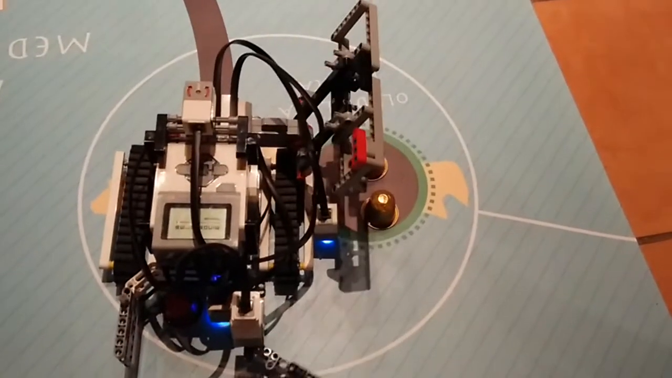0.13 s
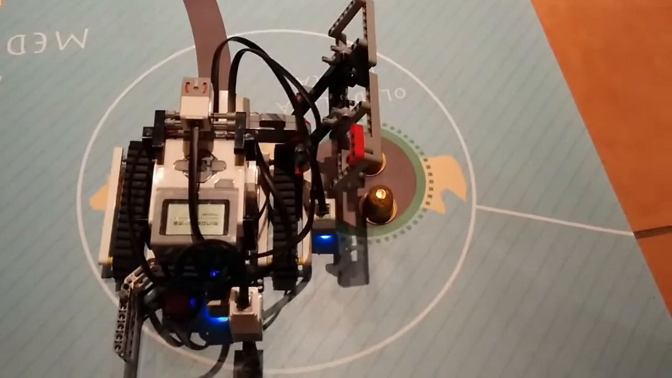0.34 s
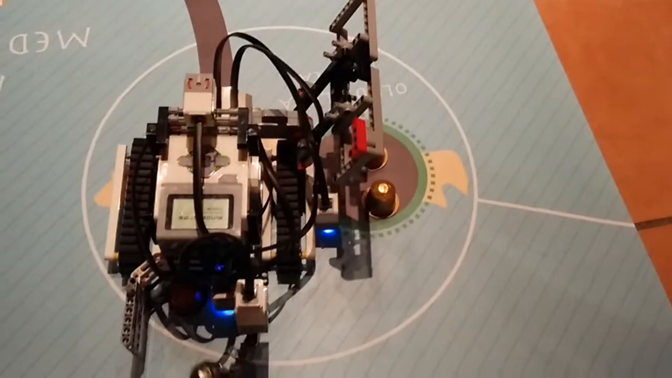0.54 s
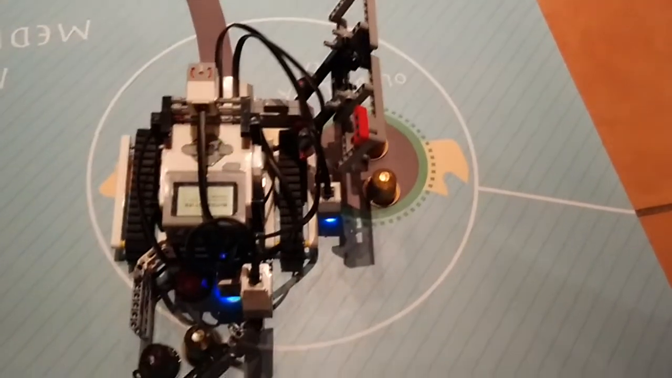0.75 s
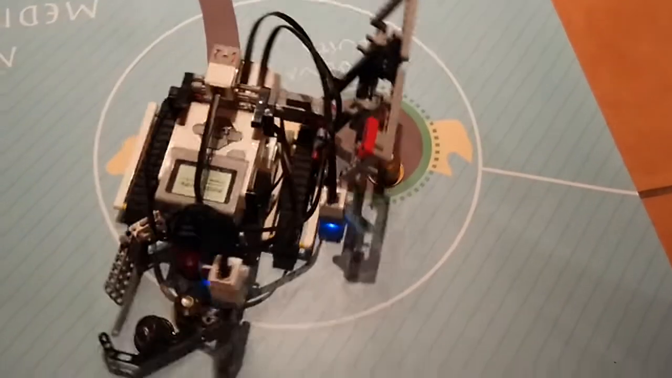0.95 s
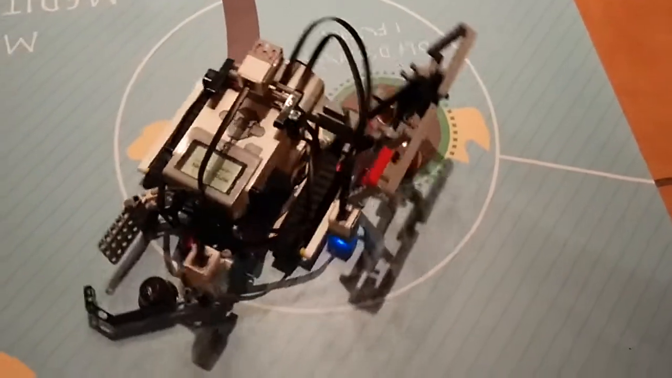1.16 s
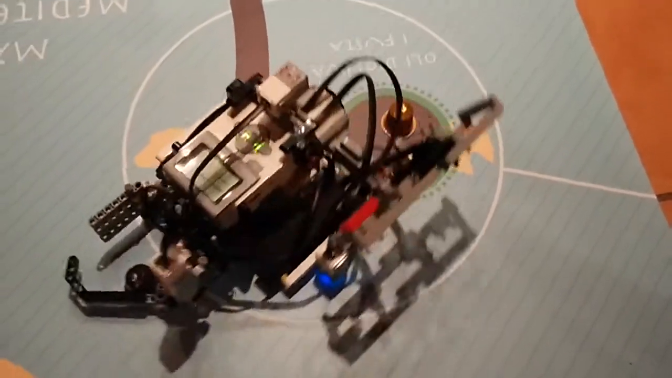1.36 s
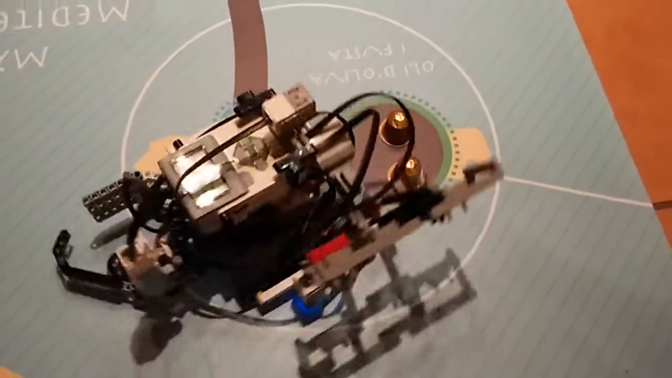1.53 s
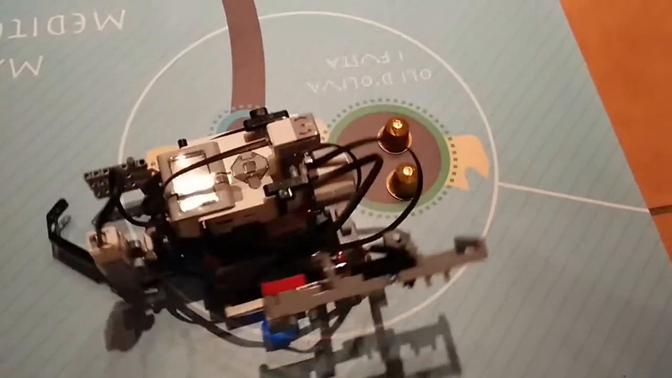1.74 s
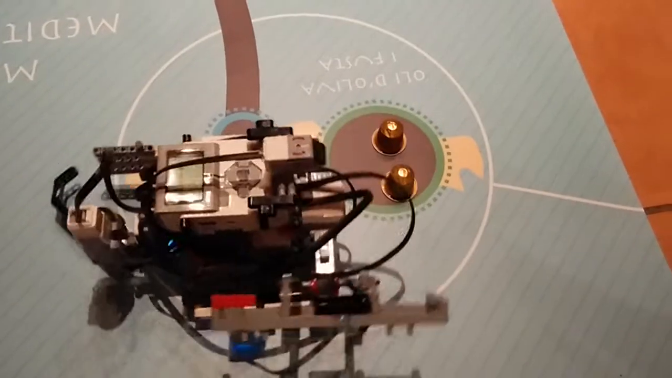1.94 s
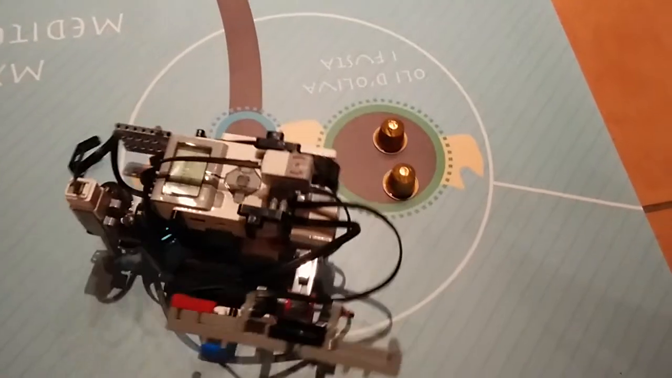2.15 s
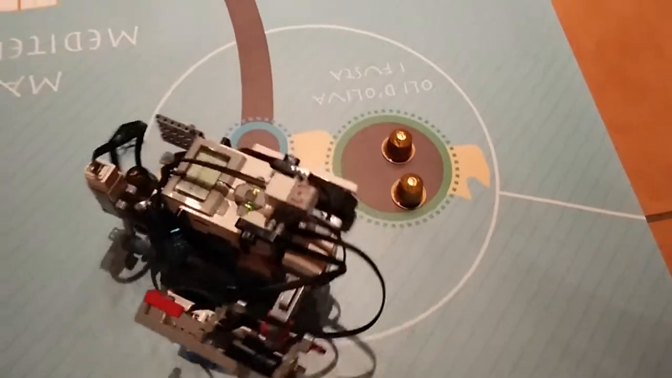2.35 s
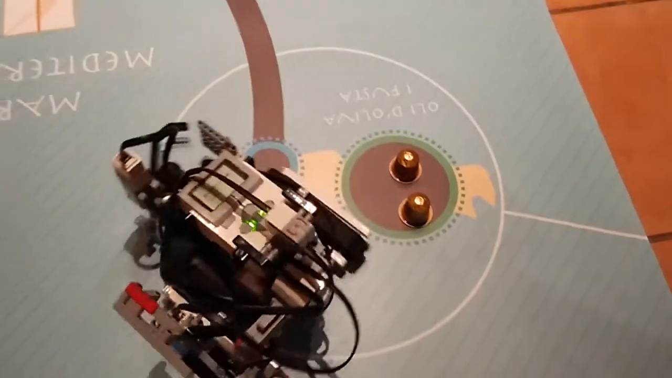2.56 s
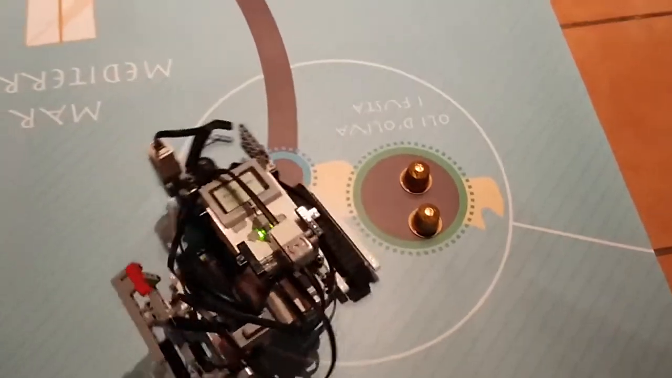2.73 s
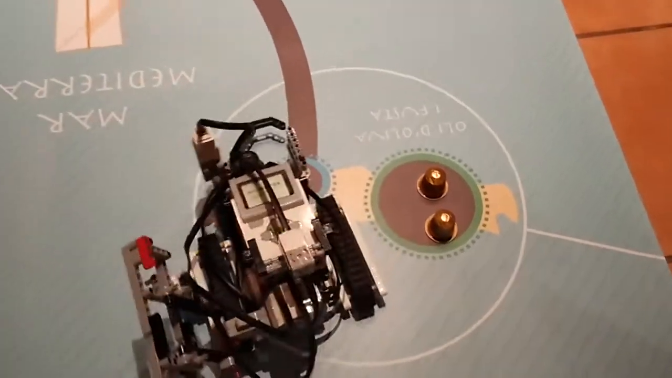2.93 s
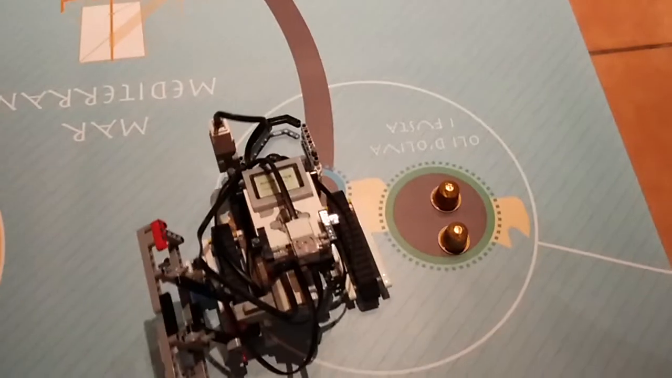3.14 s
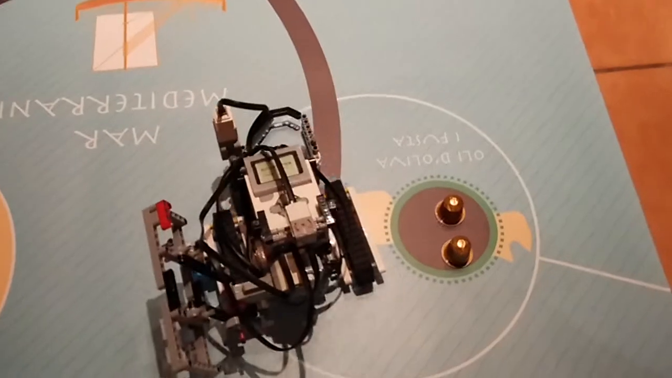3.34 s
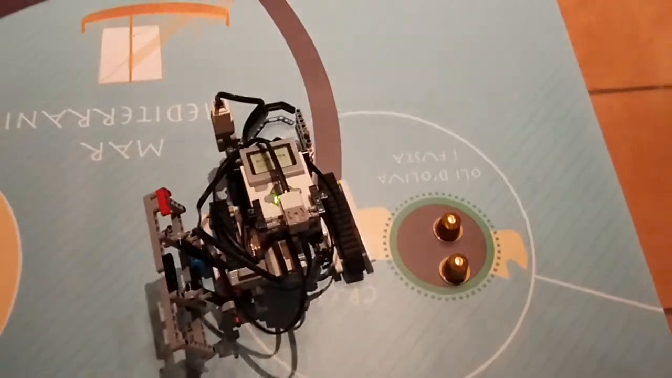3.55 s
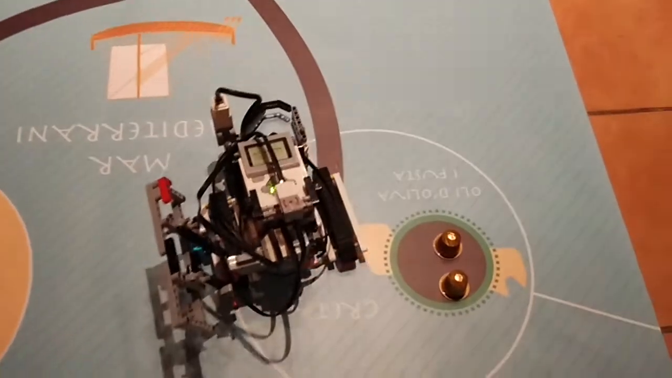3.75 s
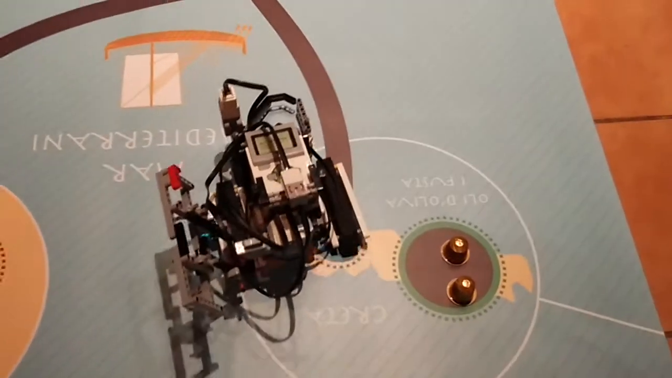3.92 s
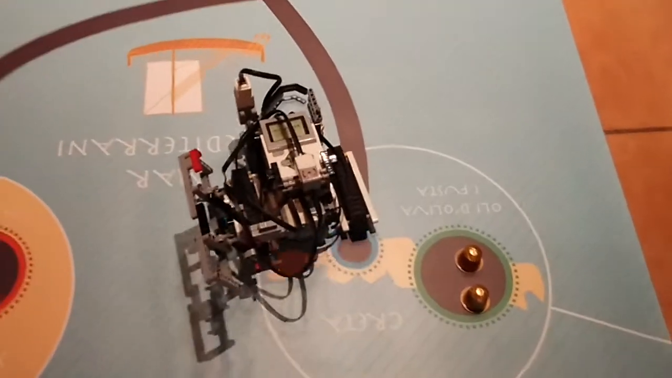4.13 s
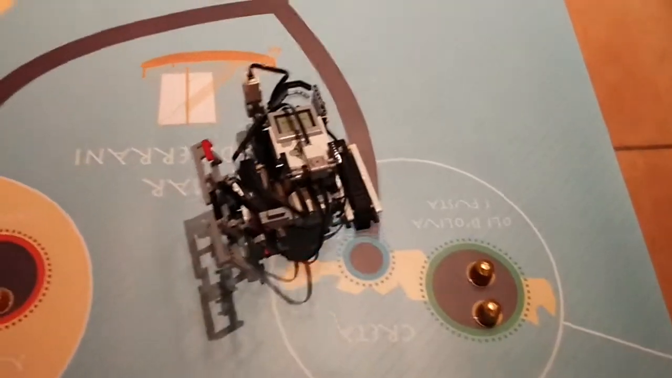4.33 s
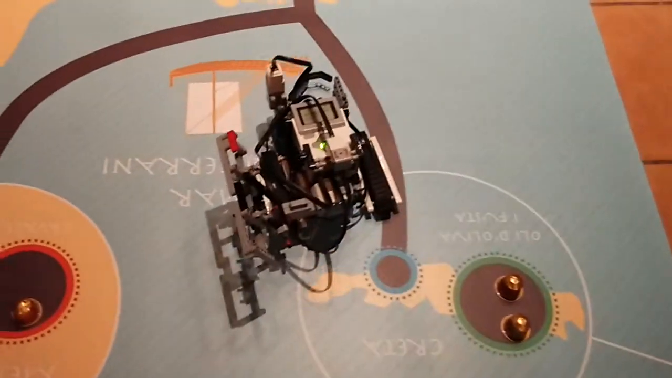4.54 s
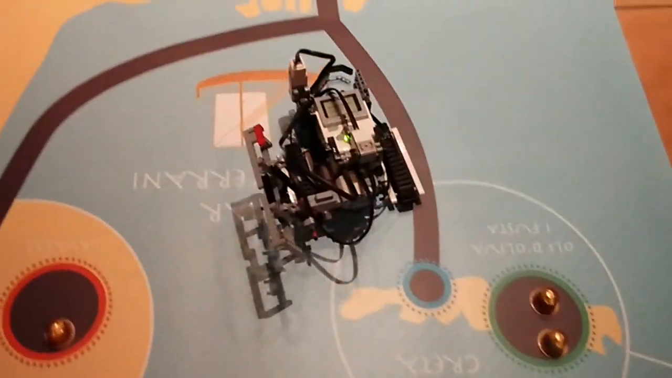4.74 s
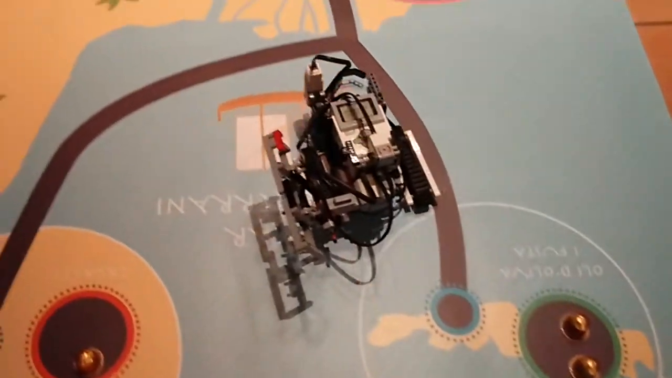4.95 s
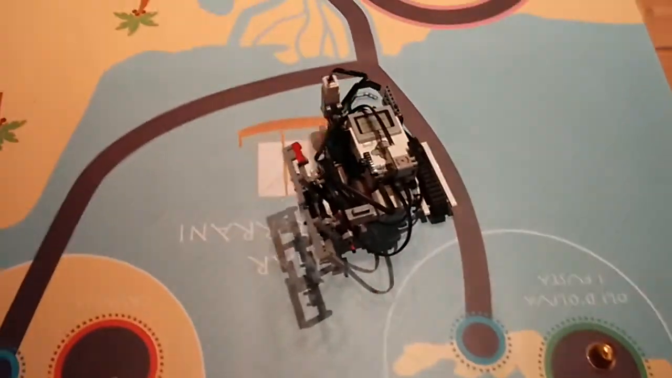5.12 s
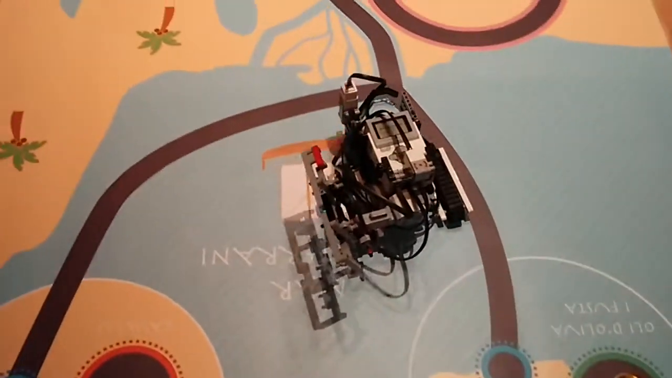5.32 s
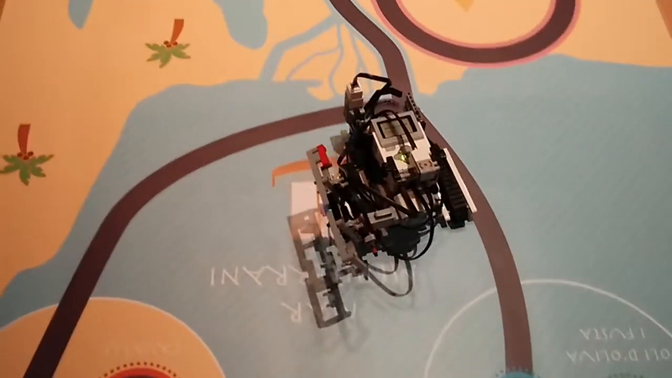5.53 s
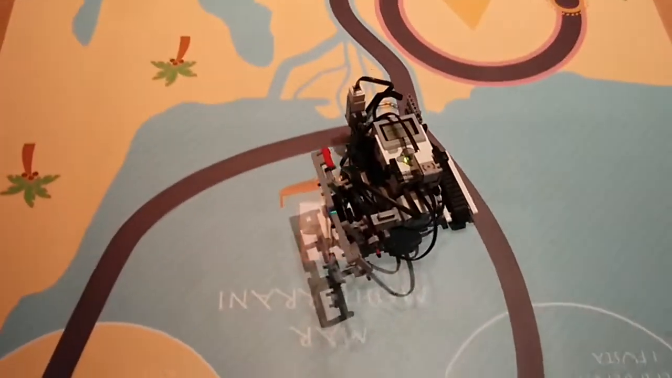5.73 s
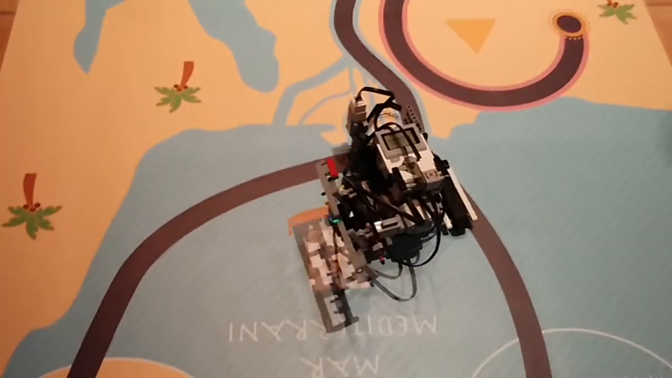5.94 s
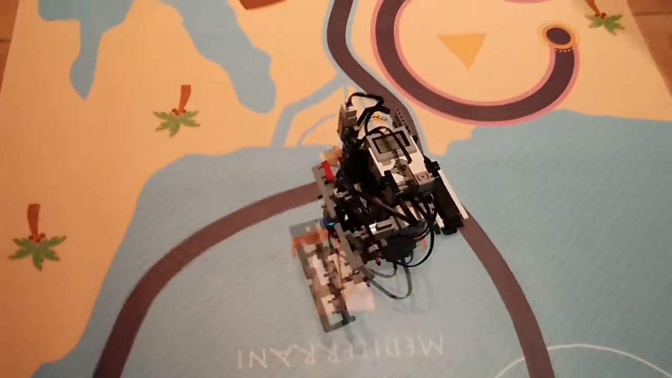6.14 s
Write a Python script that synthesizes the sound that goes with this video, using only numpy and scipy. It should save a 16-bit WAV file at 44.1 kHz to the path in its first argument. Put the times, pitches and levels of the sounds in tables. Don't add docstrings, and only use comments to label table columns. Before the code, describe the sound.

A toy robot's motors burst into a rattly, buzzing whine, soften abruptly, then climb higher with regular sags and a few dull knocks in a room.

```python
import sys
import numpy as np
from scipy import signal
from scipy.io import wavfile
from scipy.ndimage import uniform_filter1d

SR = 44100
rng = np.random.default_rng(int(sys.argv[2]) if len(sys.argv) > 2 else 0)


def voltage_ratio(level):
    return 10 ** (np.asarray(level, float) / 20)


def master(y):
    cut = np.clip(np.atleast_2d(y).T, -1, 1)
    pcm = np.round(cut * 32767)
    wavfile.write(sys.argv[1], SR, pcm.astype(np.int16))


N = 276948
T = np.arange(N) / SR
COARSE = T[::64]

# time in seconds, state
STATE = [(1.0, 0), (1.01, 1), (1.95, 1), (2.05, 2), (3.06, 2), (3.061, 0), (3.21, 0), (3.211, 3)]
AHEAD_S = 1.66, 3.27
# start in seconds, peak level in dB, pitch in Hz.
TICKS = [
    (0.046, -31.5, 5070),
    (0.209, -37.5, 5400),
    (0.292, -42, 4900),
    (0.3305, -53, 5030),
    (0.3994, -44, 5030),
]


def evened(x):
    return x / np.sqrt(np.mean(x ** 2) + 1e-20)


def read(points, hz):
    f, value = np.transpose(points)
    return np.interp(np.log(hz + 1), np.log(f + 1), value)


def curves(rows):
    s, *columns = np.transpose(rows)
    return [np.interp(T, s, column) for column in columns]


def drive_state():
    return curves(STATE)[0].round().astype(int)


def wander(rate_hz):
    low_pass = signal.butter(2, np.clip(rate_hz / SR * 128, 0, .95))
    return evened(signal.lfilter(*low_pass, rng.standard_normal(len(COARSE))))


def noise(spectrum, patchy_db=0.):
    frames, hz = N // 256 + 5, np.fft.rfftfreq(1024, 1 / SR)
    a, b, patches = rng.standard_normal((frames, 513, 3)).T
    patches = uniform_filter1d(patches, size=9, axis=0)
    patches = evened(uniform_filter1d(patches, size=10, axis=1))
    z = (a + 1j * b) * voltage_ratio(read(spectrum, hz)[:, None] + patchy_db * patches)
    return evened(signal.istft(z, nperseg=1024, noverlap=768)[1][:N])


def resonate(x, hz, width_hz):
    turn = np.exp(2j * np.pi * np.cumsum(hz * np.ones(len(x))) / SR)
    r = np.exp(-np.pi * width_hz / SR)
    smooth = signal.lfilter([(1 - r) ** 2], [1, -2 * r, r * r], x / turn)
    return 2 * (turn * smooth).real


def add(mix, s, sound):
    part = mix[round(s * SR):][:len(sound)]
    part += sound[:len(part)]


def drive():
    # time in seconds, level in dB.
    loudness = [(.7, -86), (.8, -77), (.84, -67), (.94, -32.5), (1.06, -25), (1.3, -24), (1.35, -28),
                (1.4, -25.5), (1.68, -24), (1.94, -25.5), (2.04, -38), (2.95, -38), (3.11, -40.5),
                (3.41, -36.5), (3.58, -38), (6.28, -38.5)]
    whine_levels = [2.8, 0.87, 0.42, 1.87]
    brush_levels = [-10.5, -9, -9, -6.5]
    can_levels = [-16, 1, -19, -2]

    speed_hz = motor_speeds()
    backlash = np.interp(COARSE, AHEAD_S, [.27, .5])
    (lead, shaft), (other, _) = (whine(hz, .005, .014, backlash) for hz in speed_hz)
    other_share = np.interp(T, AHEAD_S, [.45, .65])

    levels = np.array([whine_levels, brush_levels, can_levels], float)[:, drive_state()]
    whine_db, hiss_db, can_db = uniform_filter1d(levels, size=3500, axis=1)
    slip_db, slip_hz_per_s = -8, 2300
    speed_change = np.gradient(speed_hz[0]) * SR
    whine_db = whine_db + slip_db * np.minimum(speed_change / slip_hz_per_s, 1) ** 2

    throb = 1 + 0.059 * np.cos(2 * np.pi * shaft)
    teeth = voltage_ratio(whine_db) * (lead + other_share * other)
    loose = throb * (voltage_ratio(-4) * gear_rattle() + brush_hiss(hiss_db, can_db))
    level_db, = curves(loudness)
    return voltage_ratio(level_db) * (teeth + loose)


def motor_speeds():
    # time in seconds, rate in Hz.
    set_speed = [(.86, 526.5), (.92, 568), (.98, 597.9), (1.005, 694.2), (1.08, 709.6), (1.23, 710),
                 (1.45, 679.6), (1.9, 689.7), (2.2, 664), (2.6, 695.5), (2.93, 673), (3.05, 707),
                 (3.075, 696), (3.12, 562.3), (3.27, 792.4), (3.42, 878.4), (3.9, 914.5), (6.28, 905.7)]
    # slowest moment in seconds, loss of the louder motor in Hz, of the other in Hz.
    drags = [
        (3.7, 28.02, 20.7),
        (4.14, 32.15, 18),
        (4.65, 46, 40),
        (5.14, 44, 15.2),
        (5.31, 30, 12),
        (5.71, 36.1, 28),
        (6.28, 38, 14.4),
    ]
    drag_s, recover_s, speed_gap = .09, .34, .008

    set_hz, = curves(set_speed)
    lost = 0
    for s, *hz in drags:
        dip = np.interp(T - s, [-drag_s, 0, recover_s], [0, 1, 0])
        lost = lost + np.outer(hz, dip)
    both = set_hz * np.array([[1], [1 + speed_gap]]) - lost
    return uniform_filter1d(both, size=1500, axis=1)


def whine(mesh_hz, wobble, runout, fuzz, flutter_db=2.0):
    # multiple of the meshing rate, level in dB
    # speeding up, in dB while new, in dB once suppressed, in dB driving ahead.
    orders = [(1, -47, -46, -40, -26.5), (2, -23, -10.5, -14.5, -7), (2.38, -30, -19, -34, -18.5),
              (2.68, -14, -24, -14.5, -17), (3, -3, -10, -7, -5), (4, -9.5, -0.55, -7, -3),
              (4.8, -17.5, -10.5, -11, -4.5), (5, -18, 4, -3, -17), (5.4, -34, -21, -9, -15),
              (6, 2.5, 2, 2, -13), (6.4, -6.5, -10, -22, -19), (7, 0, -3.5, -9, -6),
              (8, -46, -0.5, -5, -26)]
    # frequency in Hz, level in dB.
    plastic_body = [(3250, 1), (3400, -6.5), (3530, -1), (3900, -3.5), (4100, 0), (4270, -5.5), (4700, 3.5),
                    (5560, 0), (5800, -21), (6500, -38)]
    teeth_per_turn = 10

    unsteady = 1 + wobble * np.interp(T, COARSE, wander(13.4))
    turns = np.cumsum(mesh_hz * unsteady) / SR
    off_centre = np.sin(2 * np.pi * (turns / teeth_per_turn + rng.random()))
    teeth = turns + runout * off_centre
    state = drive_state()[::64]
    out = 0
    for k, *db in orders:
        level_db = uniform_filter1d(np.array(db, float)[state], size=30)
        size = voltage_ratio(level_db + flutter_db * wander(10.4))
        size *= voltage_ratio(read(plastic_body, k * mesh_hz[::64]))
        size = size * (1 + fuzz * min(k / 2.2, 1) * (wander(55) + 1j * wander(31)))
        tone = np.exp(2j * np.pi * (k * teeth + rng.random()))
        out = out + (np.interp(T, COARSE, size) * tone).real
    return out / voltage_ratio(7.5), turns / teeth_per_turn


def gear_rattle():
    # frequency in Hz, level in dB per Hz.
    turn_colour = [(470, -47), (800, -33.5), (1220, -49), (1340, -9.5), (1500, -25), (2080, -7),
                   (2460, -19), (2730, -10.5), (3010, -5.5), (3280, -0.5), (3880, 0), (4050, -4),
                   (4380, 1.5), (5600, -4.5), (6500, -29), (8450, -46), (14300, -120)]
    # frequency in Hz, level in dB per Hz.
    ahead_colour = [(350, -32), (600, -38), (778, -35), (894, -16), (1060, -26.5), (1630, -8), (1780, -14),
                    (1930, -5), (2260, -11), (2730, -0.5), (3080, -8), (3720, 2), (6500, -7.5),
                    (8450, -31.5), (14300, -120)]

    turning = noise(turn_colour, patchy_db=1.5)
    turning = turning - resonate(turning, 5300, 330)
    ahead = np.interp(T, AHEAD_S, [0, 1])
    return np.sqrt(1 - ahead) * turning + np.sqrt(ahead) * noise(ahead_colour, patchy_db=1.2)


def brush_hiss(hiss_db, can_db):
    # frequency in Hz, level in dB per Hz.
    hiss_colour = [(3290, -32), (5600, -17), (5880, -7), (6150, -2.5), (7470, 2.5), (8200, 4), (8830, 7.5),
                   (9560, 4.5), (9960, 5.5), (10800, -19), (14000, -54), (22000, -120)]
    hiss = noise(hiss_colour, patchy_db=0.5)
    can = sum(resonate(hiss, hz, 340) for hz in [8150, 9570])
    hiss = hiss + voltage_ratio(can_db) * can
    return hiss * voltage_ratio(1.27 * np.interp(T, COARSE, wander(220)) + hiss_db)


def catches():
    # middle in seconds, length in seconds, pitch in Hz, width in Hz, level in dB.
    bites = [(.95, .035, 2950, 250, -38), (.95, .04, 4200, 1000, -33), (1.05, .03, 1100, 100, -50),
             (3.19, .03, 3980, 150, -45), (3.44, .03, 6600, 400, -42), (3.45, .03, 3545, 6, -33),
             (3.45, .03, 1772, 6, -41), (3.44, .03, 886, 6, -55), (4.03, .04, 893, 30, -58),
             (4.68, .04, 2625, 6, -42), (4.68, .04, 3495, 6, -46)]
    out = np.zeros(N)
    t = T[:SR // 3] - 1 / 6
    for s, length, hz, width_hz, db in bites:
        ring = evened(resonate(rng.standard_normal(len(t)), hz, width_hz))
        add(out, s + t[0], voltage_ratio(db) * np.exp(-(t / length) ** 2) * ring)
    return out


def arm_servo():
    # time in seconds, level in dB, centre of the main resonance in Hz.
    hold = [(0, -59.5, 5000), (.1, -52, 5200), (.25, -58, 4900), (.33, -51.5, 5100), (.55, -53.5, 5300),
            (.79, -56.5, 4880), (.84, -62, 4680)]
    # frequency in Hz, level in dB per Hz.
    sizzle_colour = [(470, -49), (800, -22.5), (1310, -20), (2270, -9), (2920, -10), (3400, -3), (3790, -3),
                     (4370, -8), (5030, -1.5), (7210, -8.5), (9360, -5), (9880, -6), (10800, -54),
                     (14000, -66), (22000, -120)]
    jolt_db, jolt_s = -19, 0.016

    level_db, hz = curves(hold + [(.92, -60, 4800), (1.1, -90, 4800)])
    ring = evened(resonate(rng.standard_normal(N), hz, 750))
    jolts = sum(voltage_ratio(db + jolt_db) * np.exp(-abs((T - s - .01) / jolt_s)) for s, db, _ in TICKS)
    sizzle = voltage_ratio(1.1) * noise(sizzle_colour, patchy_db=4.0)
    return (voltage_ratio(level_db) + jolts) * (sizzle + voltage_ratio(-0.6) * ring)


def plastic_ticks():
    # frequency in Hz, width in Hz, level in dB.
    shell = [(2000, 900, -13), (5330, 900, -13), (6530, 410, 2), (9080, 500, 7.5)]
    out, t = np.zeros(N), T[:SR // 10]
    for s, db, pitch_hz in TICKS:
        burst = rng.standard_normal(len(t)) * voltage_ratio(-60 * t / 0.1) * np.minimum(t / 0.0023, 1)
        tick = sum(voltage_ratio(g) * resonate(burst, f, w) for f, w, g in shell)
        tick = tick + voltage_ratio(-4) * resonate(burst, pitch_hz, 500)
        add(out, s, voltage_ratio(db) * tick / abs(tick).max())
    return out


def knocks():
    # start in seconds, peak level in dB, lowest Hz, highest Hz, time to fade by 60 dB in seconds.
    blows = [
        (4.008, -56, 200, 900, .12),
        (5.153, -33.5, 270, 480, 0.27),
        (5.153, -35, 500, 800, 0.36),
        (5.93, -37.5, 140, 400, .24),
        (5.94, -50, 550, 677, .12),
    ]
    cut_share = 0.88

    out, t = np.zeros(N), T[:SR // 4]
    for s, db, low_hz, high_hz, t60 in blows:
        band = signal.cheby2(4, 40, [.8 * low_hz, 1.15 * high_hz], "band", fs=SR, output="sos")
        strike = 1 + 1.7 * np.exp(-t / 0.0019)
        fade = voltage_ratio(-60 * np.maximum(t - .03, 0) / t60)
        tail = signal.sosfilt(band, rng.standard_normal(len(t)) * strike * fade)
        cut = np.clip((cut_share * t60 - t) / 0.011, 0, 1)
        add(out, s, voltage_ratio(db) * tail / abs(tail).max() * cut)
    return out


def room():
    # frequency in Hz, level in dB per Hz.
    murmur = [(15, -77), (25, -47), (64, -111), (202, -15), (302, -24), (329, -18), (370, -23.5),
              (667, -22), (874, -22.5), (983, -19), (1220, -14.5), (1400, -15), (1820, -19), (3080, -120)]
    return voltage_ratio(-61.5) * noise(murmur, patchy_db=1.0)


def scene():
    mono = drive() + catches() + arm_servo() + plastic_ticks() + knocks() + room()
    return np.array([mono, mono])


def redraw_treble(x):
    # frequency in Hz, share of cells redrawn.
    redrawn = [(4000, 0), (4700, .04), (5600, .04), (6200, .15), (7500, .28), (9000, .5), (10400, .35)]
    # time in seconds, factor on that share.
    new_sound = [
        (.95, 1),
        (1.0, .45),
        (2.2, .45),
        (2.3, 1),
    ]

    hz, t, z = signal.stft(x, SR, nperseg=2048, noverlap=1024, window="cosine")
    band = (np.log(hz + 1) * 5.5).astype(int)
    share = read(redrawn, np.exp((band + .5) / 5.5)) * (hz < 10300)
    share = share[:, None] * np.interp(t, *np.transpose(new_sound))
    swapped = rng.random((len(t), band.max() + 1)).T[band] < share
    size = np.sqrt(uniform_filter1d(abs(z) ** 2, size=25, axis=0) / 2 + 1e-24)
    a, b = rng.standard_normal((len(t), len(hz), 2, 2)).T
    z = np.where(swapped, size * (a + 1j * b), z)
    return signal.istft(z, SR, nperseg=2048, noverlap=1024, window="cosine")[1][:, :N]


def band_limit(x):
    return signal.sosfilt(signal.butter(12, 10930, fs=SR, output="sos"), x)


def record(dry):
    bass_cut = signal.butter(5, 145, "high", fs=SR, output="sos")
    mix = redraw_treble(signal.sosfilt(bass_cut, dry[0]))
    return band_limit(mix)


dry = scene()
out = record(dry)
master(out)
```